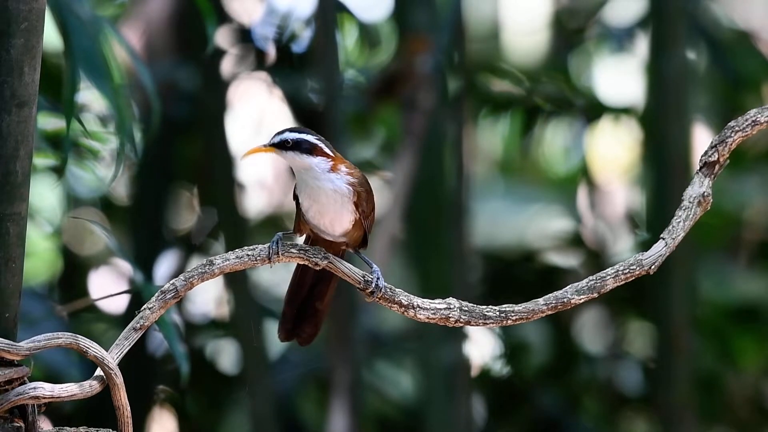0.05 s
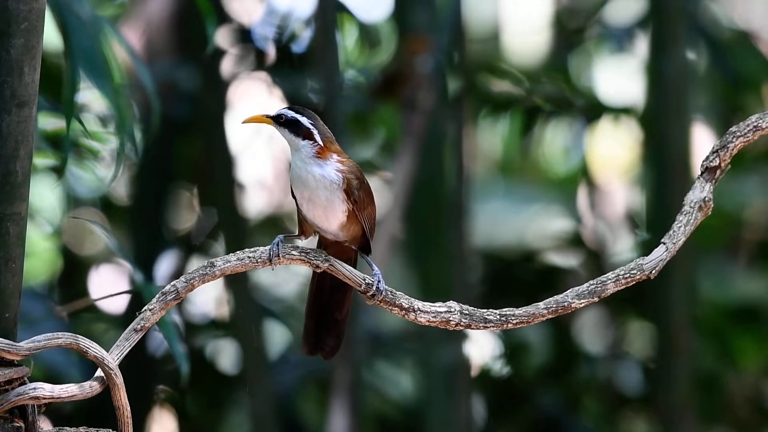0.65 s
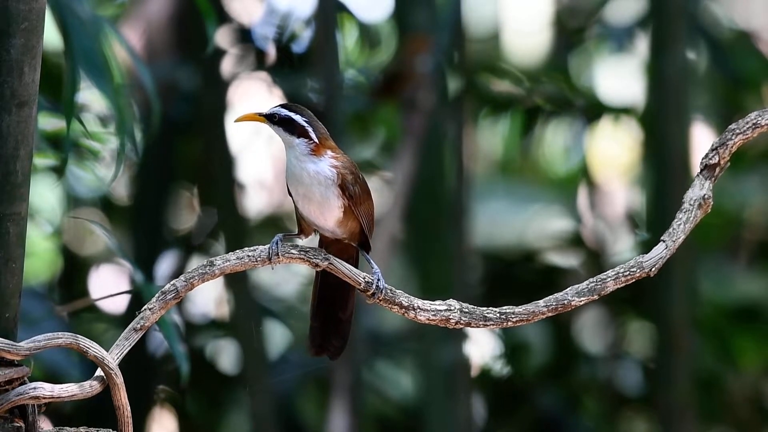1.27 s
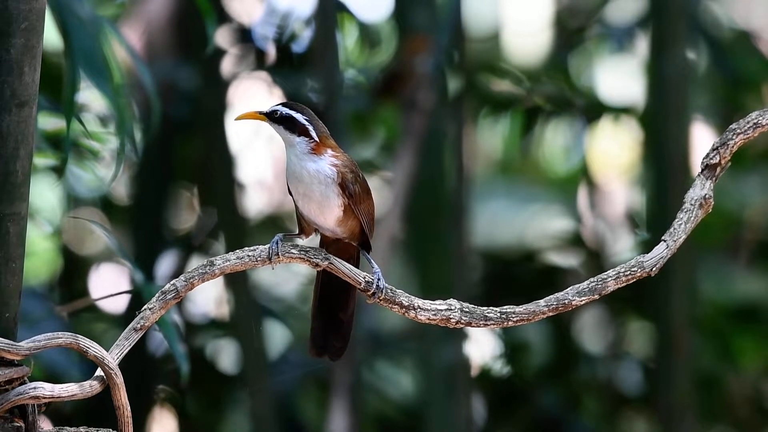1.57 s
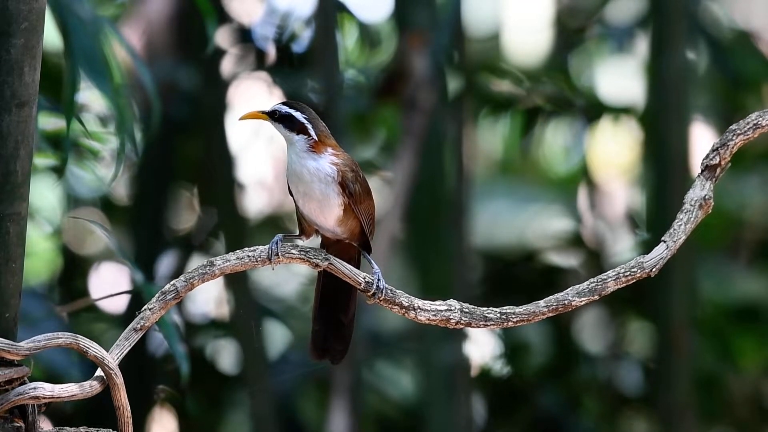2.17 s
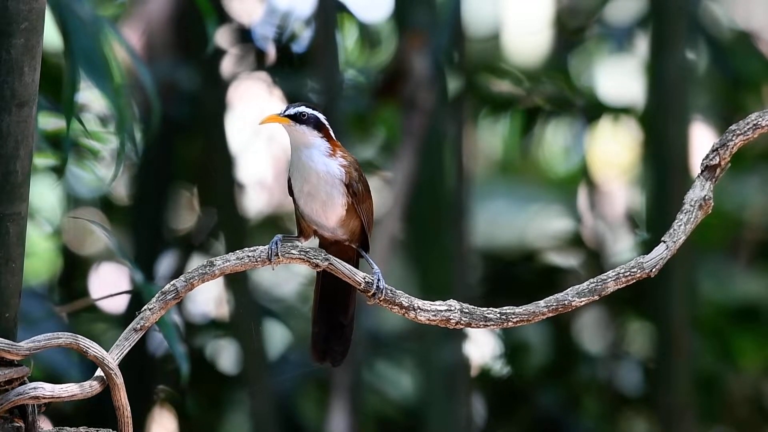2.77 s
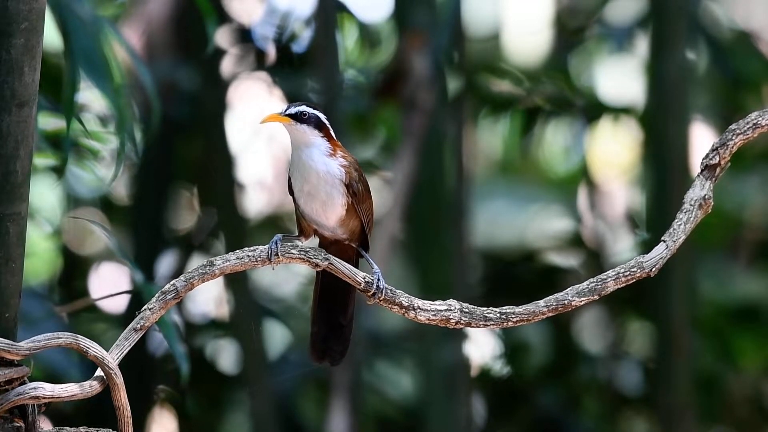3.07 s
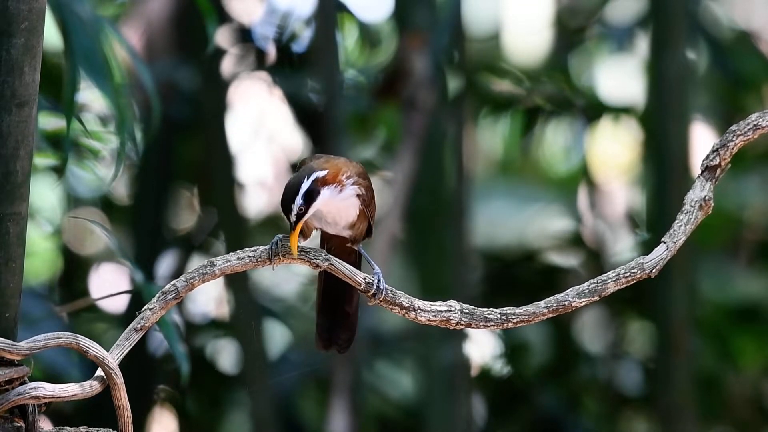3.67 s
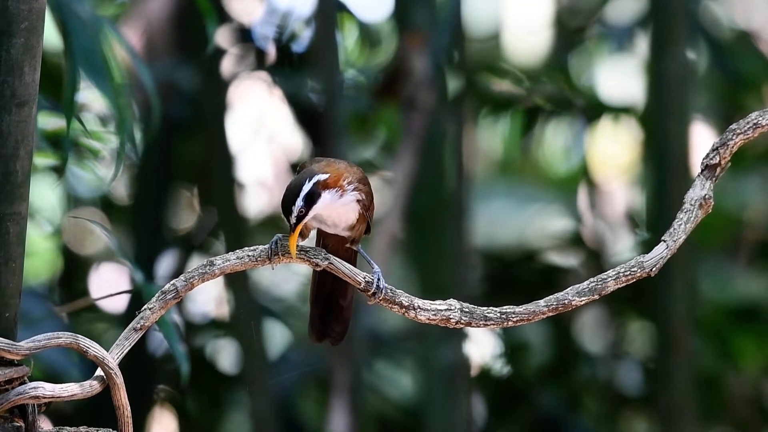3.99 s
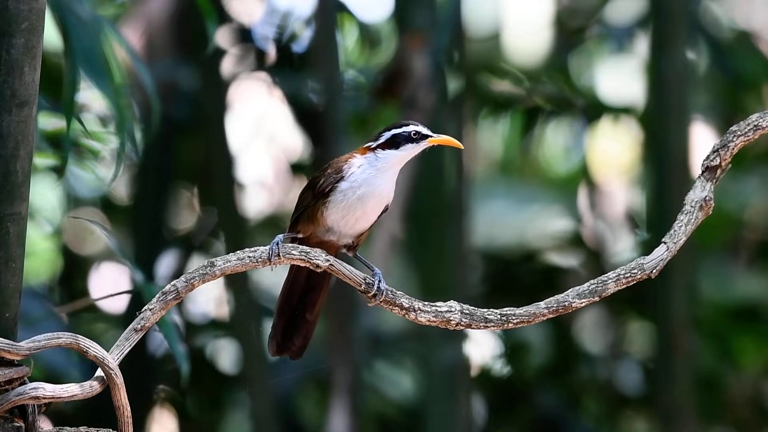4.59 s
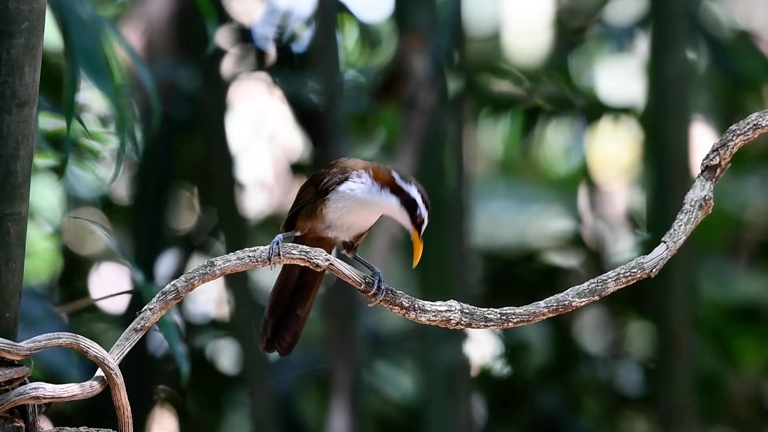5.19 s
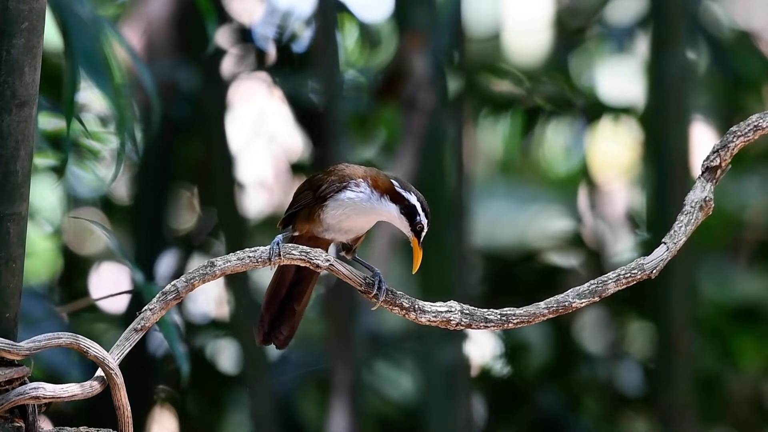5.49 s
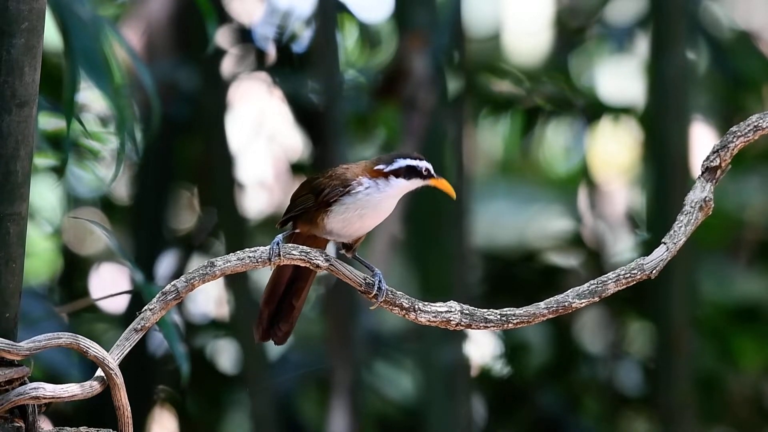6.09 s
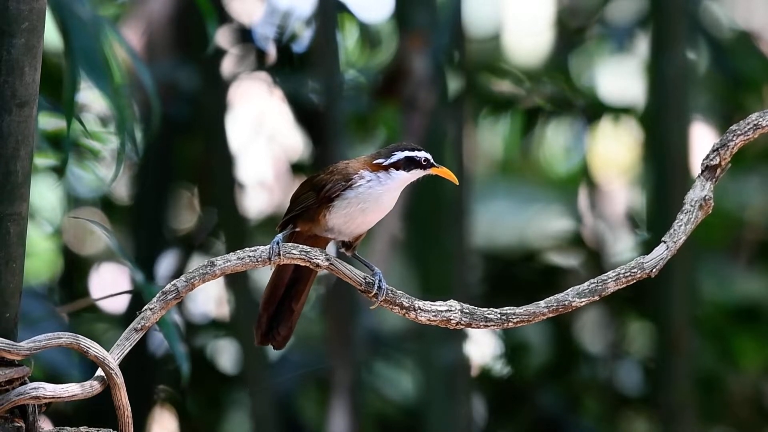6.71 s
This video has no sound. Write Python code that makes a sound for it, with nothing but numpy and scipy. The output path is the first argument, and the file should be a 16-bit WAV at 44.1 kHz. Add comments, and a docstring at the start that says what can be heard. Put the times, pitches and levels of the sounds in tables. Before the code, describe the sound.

Camera shutters clack with a brief motor whirr over steady, pulsing cicadas in a forest, and a faraway bird whistles once.

```python
"""Photographers in a cicada forest

Two spaced microphones stand among the trees near a bird's perch, in low forest air and an insect chorus.
Cicadas swell above it about once a second. Close on the left a camera fires four times: latch, mirror
and shutter knock its body over the whirr of the winding motor. Other cameras click farther off on both
sides, and a distant bird whistles one short phrase, smeared by echoes from trunks and leaves."""
import sys
import numpy as np
from scipy import signal
from scipy.fft import rfft, irfft
from scipy.io import wavfile
from scipy.ndimage import uniform_filter1d

SR = 44100
rng = np.random.default_rng(int(sys.argv[2]) if len(sys.argv) > 2 else 0)


def store_pcm(level_fs):
    """Save levels as 16-bit WAV."""
    pcm = np.round(np.clip(level_fs, -1, 1) * 32767).astype(np.int16)
    wavfile.write(sys.argv[1], SR, np.atleast_2d(pcm).T)


N = 302085
SHORT = 8192  # samples in one blow


def gain_of(db):
    """Decibels to gain."""
    return 10 ** (np.asarray(db) / 20)


def unit_rms(x):
    """Scales to rms 1."""
    return x / np.sqrt(np.mean(x ** 2) + 1e-20)


def curve(points, hz):
    """Reads a table on a log-frequency axis."""
    f, value = np.transpose(points)
    return np.interp(np.log(hz + 1), np.log(f + 1), value)


def add(mix, s, sound):
    """Adds a stereo sound at time s."""
    part = mix[:, max(round(s * SR), 0):][:, :sound.shape[1]]
    part += sound[:, :part.shape[1]]


def bins(n):
    """Frequencies of a spectrum of n samples."""
    return np.fft.rfftfreq(n, 1 / SR)


def bump(f, hz, width):
    """A resonance curve of height 1."""
    return 1 / (1 + (2 * (f - hz) / width) ** 2)


def panned(lean_db):
    """Gains at the two microphones; a positive lean is to the left."""
    return gain_of(np.array([[.5], [-.5]]) * lean_db)


def hiss(spectrum, patchy_db, lean_db):
    """Many far sources merge into noise, each briefly standing out at its own pitch."""
    # The forest's balance at the microphones. Each row: frequency in Hz, left over right in dB.
    forest_lean = [(60, -8), (92, 3.5), (140, -3.5), (210, -3), (330, -1), (500, -3), (770, -2),
                   (1170, -3.5), (1790, -3.5), (2740, -3), (4190, -2), (6410, -6.5), (9810, 8),
                   (15000, 3.5)]
    # How alike the two sides are. Each row: frequency in Hz, correlation.
    likeness = [(30, 0.52), (100, 0.31), (300, .45), (600, 0.25), (1200, 0), (16000, 0.0099)]
    frames, f = N // 512 + 5, bins(2048)
    a, b, c, d, patches = rng.standard_normal((5, frames, len(f)))
    patches = uniform_filter1d(patches, size=12, axis=0)
    patches = unit_rms(uniform_filter1d(patches, size=3, axis=1))
    same = curve(likeness, f)
    left = a + 1j * b
    right = same * left + np.sqrt(1 - same ** 2) * (c + 1j * d)
    colour = gain_of(curve(spectrum, f) + patchy_db * patches)
    spectra = np.array([left, right]) * colour * panned(curve(forest_lean, f) + lean_db)[:, None]
    noise = signal.istft(spectra.transpose(0, 2, 1), nperseg=2048, noverlap=1536)[1][:, :N]
    return noise / noise.mean(0).std()


def forest_air():
    """A low, steady wash from far off all round."""
    # Colour of the air. Each row: frequency in Hz, relative level in dB.
    spectrum = [(20, -28), (35, -21), (52, 1), (85, -1.5), (125, 1), (200, -2.5), (252, 1), (320, -3),
                (385, -0.5), (480, -2.5), (700, -7), (1050, -5), (1800, -10), (3000, -11), (4200, -19),
                (7000, -77)]
    return gain_of(-63) * hiss(spectrum, patchy_db=1.67, lean_db=2)


def singer(hz, width):
    """One insect's shrill note, blurred by the trees."""
    noise = rng.standard_normal((2, N))
    return unit_rms(irfft(rfft(noise) * bump(bins(N), hz, width), N))


def insect_chorus():
    """Far insects blend into a band with a high sheen; a few held notes rise and fall with it."""
    # Colours of the chorus and its sheen. Each row: frequency in Hz, relative level in dB.
    chorus_colour = [(1800, -36), (2700, -17.5), (3100, -10.5), (3500, -4), (4000, -2), (4350, -1),
                     (4650, -4.5), (5300, -3), (6300, -6), (7000, -10.5), (7500, -14), (9500, -49)]
    sheen_colour = [(6000, -37), (7500, 2.5), (10000, -6.5), (12500, -1), (14500, 2), (16000, -15)]
    # Ebb of the chorus, and the strongest singer's own on top. Each row: time in seconds, level in dB.
    chorus_levels = [(0.0, -50.5), (0.35, -53), (0.56, -56.5), (0.84, -51.6), (0.98, -52.3), (1.16, -60),
                     (1.37, -52.5), (2.83, -52), (3.65, -53.5), (4.15, -51.0), (4.6, -53.2), (4.81, -50.5),
                     (5.44, -54.5), (5.83, -50.5), (6.34, -54), (6.85, -54)]
    leader_levels = [(0, -73), (.35, -56), (.55, -65), (1.4, -61), (1.85, -57.5), (2.3, -61.5), (4, -62.5),
                     (4.6, -65), (6.85, -64)]
    # Single insects. Each row: pitch in Hz, width in Hz, level in dB, left over right in dB.
    singers = [(3930, 76, -71, -3), (5170, 80, -69, -11), (8450, 50, -71, -11)]
    t = np.arange(N) / SR
    chorus_db = np.interp(t, *np.transpose(chorus_levels))
    out = gain_of(chorus_db - 0.35) * hiss(chorus_colour, patchy_db=2.5, lean_db=-0.5)
    out += gain_of(.85 * chorus_db - 22) * hiss(sheen_colour, patchy_db=3.5, lean_db=1.5)
    leader_db = np.interp(t, *np.transpose(leader_levels))
    notes = gain_of(leader_db) * singer(hz=4290, width=62) * panned(-2.5)
    for hz, width, db, lean_db in singers:
        notes += gain_of(db) * singer(hz, width) * panned(lean_db)
    return out + notes * unit_rms(gain_of(chorus_db))


def swelling(floor_db, crest_db, lag_s, rise_s, fall_s):
    """Gain of a cicada band: each swell grows steadily out of the floor, then rounds off and drops."""
    # Cicada swells. Each row: crest time in seconds before the lag, relative level in dB.
    swells = [(-.07, -1.5), (.81, -.5), (1.73, -0.2), (2.68, 0.2), (3.63, 0), (4.55, 1), (5.51, -0.4),
              (6.52, 0.6)]
    t = np.arange(N) / SR - lag_s
    power = gain_of(floor_db) ** 2
    for s, db in swells:
        away = np.maximum((s - t) / rise_s, 0) + np.maximum((t - s) / fall_s, 0) ** 2
        power = power + gain_of(crest_db + db) ** 2 * np.exp(-np.minimum(away, 20))
    return np.sqrt(power)


def cicadas():
    """Cicadas swell about once a second, the high fizz first and the buzz just after."""
    # The two cicada bands. Each row: frequency in Hz, relative level in dB.
    buzz_colour = [(7200, -33), (7800, -10), (8200, -5.5), (8550, -2.5), (9000, -5), (9500, -11),
                   (10000, -15), (11000, -36)]
    fizz_colour = [(8000, -21), (9400, -2), (10000, -2.5), (10700, -1), (11500, -6), (12500, -10),
                   (14000, -22), (16000, -17)]
    buzz = hiss(buzz_colour, patchy_db=3.1, lean_db=-6.0)
    buzz *= swelling(floor_db=-61.5, crest_db=-54.0, lag_s=0.068, rise_s=0.14, fall_s=0.13)
    fizz = hiss(fizz_colour, patchy_db=3.0, lean_db=1.5)
    fizz *= swelling(floor_db=-64.5, crest_db=-54.5, lag_s=.004, rise_s=0.12, fall_s=.14)
    return buzz + fizz


def strike(decay_s, rise_s):
    """Envelope of a blow: parts seat quickly, then settle."""
    t = np.arange(SHORT) / SR
    envelope = (1 - np.exp(-(t / rise_s) ** 2)) * np.exp(-t / decay_s)
    return envelope / envelope.max()


def ringing(db):
    """Frequency response of unit power that rings only after the blow."""
    cepstrum = irfft(np.log(gain_of(db)))
    half = len(cepstrum) // 2
    cepstrum[1:half] *= 2
    cepstrum[half + 1:] = 0
    return np.exp(rfft(cepstrum)) / np.sqrt(np.mean(gain_of(db) ** 2))


def chatter(envelope, colour_db, lean_db, lag_s, diffuse_hz):
    """Dense tiny contacts ring a body; the right microphone hears it lag_s after the left."""
    n, f = len(envelope), bins(len(envelope))
    spectra = rfft(rng.standard_normal((2, n)) * envelope)
    # a brief contact excites all frequencies about equally
    local_power = uniform_filter1d(abs(spectra) ** 2, size=len(f) // 140)
    spectra *= np.sqrt(np.sum(envelope ** 2) / (local_power + 1e-20))
    same = 1 / (1 + (f / diffuse_hz) ** 2)  # scattering makes the treble differ between the sides
    spectra[1] = same * spectra[0] + np.sqrt(1 - same ** 2) * spectra[1]
    spectra[1] *= np.exp(-2j * np.pi * f * lag_s)
    fade = np.minimum(np.linspace(10, 0, n), 1) ** 2
    return irfft(spectra * ringing(colour_db) * panned(lean_db)) * fade


def trees(x, t60):
    """Sparse echoes from trunks and leaves, dying by 60 dB in t60 seconds."""
    t = np.arange(SR) / SR
    taps = rng.standard_normal((2, SR)) * (rng.random((2, SR)) < 1500 / SR)
    taps *= gain_of(-60 * t / t60) * (t > .006)
    taps /= np.linalg.norm(taps, axis=1, keepdims=True)
    return signal.fftconvolve(x, taps, axes=1)[:, :N]


def far_camera(clicks, colour, lean_db, lag_s, echo_db):
    """A shutter rings its camera body farther along the row, with a short echo."""
    out, f = np.zeros((2, N)), bins(SHORT)
    for s, db, decay_s, ring_hz, ring_db in clicks:
        colour_db = curve(colour, f) + ring_db * bump(f, ring_hz, 0.16 * ring_hz)
        click = chatter(strike(decay_s, rise_s=0.0027), colour_db, lean_db, lag_s, diffuse_hz=5900)
        add(out, s, gain_of(db) * click)
    return out + gain_of(echo_db) * trees(out, t60=0.066)


def far_cameras():
    """Two cameras at a distance: one to the right, a softer one to the left."""
    # Shutter clicks. Each row: start in seconds, level in dB, decay in seconds, ring in Hz, its lift in dB.
    right_clicks = [(.002, -31.5, 0.0032, 2060, 6), (.011, -36, 0.0028, 2600, 8),
                    (.024, -38.5, 0.012, 1246, 16), (.045, -36.5, 0.0045, 690, 12),
                    (.0495, -32, 0.002, 2090, 18), (.078, -39, .004, 2190, 5), (.098, -32, 0.0027, 2600, 0),
                    (5.6995, -34.5, 0.0029, 1420, 11), (5.707, -39.5, 0.0076, 3700, 9),
                    (5.863, -35, 0.0048, 2330, 8), (5.871, -43.5, 0.0083, 1480, 12)]
    left_clicks = [(.9725, -40.5, 0.0054, 1000, 5.5), (1.1, -41, 0.0035, 2800, 2.2),
                   (4.299, -42, 0.007, 1000, 7.1), (4.812, -43.5, 0.0069, 1400, 1.6)]
    # Colours of the two bodies. Each row: frequency in Hz, relative level in dB.
    right_colour = [(200, -21), (600, -13), (1000, -15), (1420, -7), (1700, -7.5), (2300, 1), (2900, -1),
                    (3600, -5.5), (4500, -1.5), (5200, -5.5), (6700, -5), (8000, -26), (15000, -30)]
    left_colour = [(200, -39), (600, -4), (800, -19), (1020, -1.5), (1200, -6), (1420, 1), (1620, -10),
                   (1850, -1), (2800, -1.5), (3500, -14), (6000, -15), (14000, -30)]
    right = far_camera(right_clicks, right_colour, lean_db=-7.0, lag_s=-.00016, echo_db=-10.0)
    left = far_camera(left_clicks, left_colour, lean_db=5.0, lag_s=0.00024, echo_db=-14)
    return right + left


def camera_body(envelope, extra_db, diffuse_hz):
    """Contacts inside the near camera ring its body; extra_db is the moving part's own colour."""
    # Broad colour of the body. Each row: frequency in Hz, relative level in dB.
    colour = [(70, -38), (160, -14), (280, -7.5), (600, -9.5), (900, -5), (1200, -4), (2400, -2),
              (3500, -4.5), (5000, -5.5), (7000, -11), (9000, -15), (11000, -12.5), (15000, -26)]
    # Its modes. Each row: frequency in Hz, width in Hz, lift in dB.
    modes = [(1430, 120, 2.9), (1966, 290, 6.1), (2640, 190, 3.8), (2980, 180, 6.5), (3980, 240, 7),
             (4590, 220, 3.3), (5580, 540, 6.7), (6570, 270, 7.6)]
    # Its balance at the microphones. Each row: frequency in Hz, left over right in dB.
    lean = [(300, -3), (700, 3.5), (1500, 3), (2400, 8.5), (3400, 2), (4200, 1.5), (5800, -8.5), (7000, -6),
            (8600, 3), (11000, 13.5), (14000, 1.5)]
    f = bins(len(envelope))
    body_db = curve(colour, f) + sum(db * bump(f, hz, width) for hz, width, db in modes)
    return chatter(envelope, body_db + extra_db, curve(lean, f), lag_s=.00024, diffuse_hz=diffuse_hz)


def whistle(hz, taper):
    """A pure tone along a pitch curve, fading in and out."""
    phase = 2 * np.pi * np.cumsum(hz) / SR
    return np.sqrt(2) * np.sin(phase) * signal.windows.tukey(len(hz), taper)


def whine(top_hz):
    """The coasting motor sings a falling, unsteady note with its octave."""
    coast_s, slowing_per_s = 0.044, 9.1
    t = np.arange(0, coast_s, 1 / SR)
    wobble = unit_rms(uniform_filter1d(rng.standard_normal(SHORT), size=60))[:len(t)]
    hz = top_hz * np.exp(-slowing_per_s * t) * (1 + 0.026 * wobble)
    return (whistle(hz, taper=0.18) + gain_of(-11) * whistle(2 * hz, taper=0.58)) * panned(2.2)


def winding_motor(mirror_s):
    """The winder runs twice in a shot: gear teeth whirr, and the motor whines as it coasts down."""
    # Motor runs. Each row: start in seconds from the mirror, length in seconds, gear level in dB,
    # top of the whine in Hz, whine level in dB.
    runs = [(-.107, 0.1, -47, 4110, -54), (0.042, .093, -45, 4330, -50)]
    rise_s, stop_s, drive_s, tooth_hz = 0.003, 0.004, .04, 190
    t = np.arange(2 * SHORT) / SR - mirror_s
    teeth = 1 + 0.099 * np.sin(2 * np.pi * tooth_hz * t)
    running = np.zeros(len(t))
    for s, length, db, _, _ in runs:
        ramps = np.minimum((t - s) / rise_s, (s + length - t) / stop_s)
        running += gain_of(db) * np.clip(ramps, 0, 1)
    gears_db = 4 * bump(bins(len(t)), hz=2740, width=1500)
    out = camera_body(teeth * running, gears_db, diffuse_hz=4530) * panned(0.83)
    for s, _, _, top_hz, db in runs:
        add(out, mirror_s + s + drive_s, gain_of(db) * whine(top_hz))
    return out


def shot(mirror_s):
    """One cycle of the near camera: blows of latch, mirror and shutter over the winder."""
    # Blows. Each row: start in seconds from the mirror, level in dB, decay in seconds, ring in Hz,
    # then lifts of ring, bass and treble in dB.
    blows = [(-.0886, -26.5, 0.00083, 2360, 13.5, -19, 2), (-.044, -48, 0.0065, 572, 15, 20, -12),
             (-.0245, -42, 0.0027, 2200, -1, -5, 0), (0, -26.5, 0.0031, 1760, 6, -3.5, -9),
             (0.0384, -29.5, 0.0045, 1215, 15, 6.5, 9), (.055, -39, 0.0051, 2700, 0, 8.5, 2),
             (.072, -36, .003, 2570, 12, -18, 5), (.082, -39, .003, 2500, 11, -27, -4),
             (0.1025, -33, 0.0044, 3060, -2, -1, 5), (0.113, -31.5, 0.0027, 1365, 17.5, -13, -8)]
    out, f = winding_motor(mirror_s), bins(SHORT)
    for s, db, decay_s, ring_hz, ring_db, bass_db, treble_db in blows:
        tilt_db = bass_db * bump(f, 0, 2250) + treble_db * f / (f + 5000)
        part_db = ring_db * bump(f, ring_hz, 0.17 * ring_hz) + tilt_db
        blow = camera_body(strike(decay_s, rise_s=0.38 * decay_s), part_db, diffuse_hz=6760)
        add(out, mirror_s + s, gain_of(db) * blow)
    return out


def near_camera():
    """Close on the left, the mechanism runs the same way at every shot; the trees answer faintly."""
    # Shots. Each row: time of the mirror strike in seconds, relative level in dB.
    shots = [(1.5758, -1.5), (3.1137, -1), (5.1842, -1), (6.755, -1)]
    mirror_s = .15  # how far into the cycle the mirror strikes
    out, cycle = np.zeros((2, N)), shot(mirror_s)
    for s, db in shots:
        add(out, s - mirror_s, gain_of(db) * cycle)
    return out + gain_of(-19.5) * trees(out, t60=0.36)


def bird():
    """A distant whistled phrase, more echo than direct sound; each note slides, then settles."""
    # Notes. Each row: start and length in seconds, first and last pitch in Hz, relative level in dB.
    notes = [(1.85, .07, 1593, 2070, -65), (1.933, .058, 2630, 2870, -60), (2.01, 0.048, 2305, 2016, -61.5),
             (2.097, 0.06, 3380, 3390, -57), (2.137, .055, 2980, 2460, -56)]
    out = np.zeros((2, N))
    for s, length, first_hz, last_hz, db in notes:
        slide = np.linspace(1, 0, round(length * SR)) ** 1.82
        hz = last_hz + (first_hz - last_hz) * slide
        add(out, s, gain_of(db) * whistle(hz, taper=0.26) * panned(0))
    return gain_of(-2.0) * out + gain_of(2.5) * trees(out, t60=0.53)


def scene():
    """Air, insects, cameras and bird as they reach the microphones."""
    return forest_air() + insect_chorus() + cicadas() + far_cameras() + near_camera() + bird()


def record(dry):
    """Two deep notches fall in the treble, then the recorder limits the band."""
    # Notches. Each row: centre in Hz, width in Hz.
    notches = [(7680, 233), (9600, 230)]
    f = bins(N)
    cut_db = sum(-29 * np.exp(-2 * ((f - hz) / width) ** 2) for hz, width in notches)
    notched = irfft(rfft(dry) * gain_of(cut_db), N)
    lowpass = signal.firwin(511, cutoff=15750, window=("kaiser", 9), fs=SR)
    return signal.oaconvolve(notched, lowpass[None], "same")


dry = scene()
out = record(dry)
store_pcm(out)
```